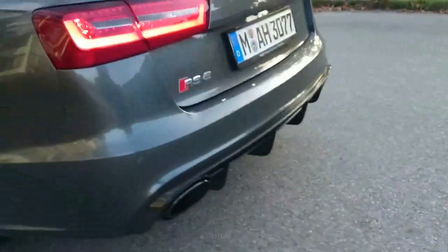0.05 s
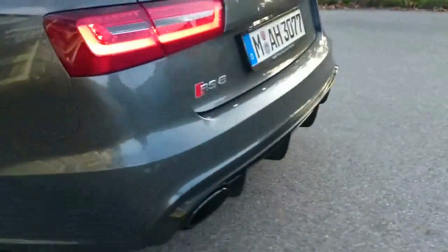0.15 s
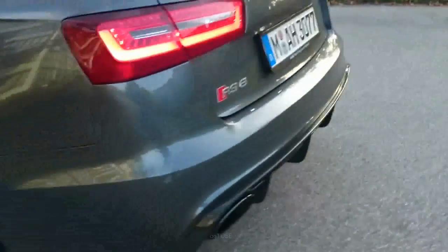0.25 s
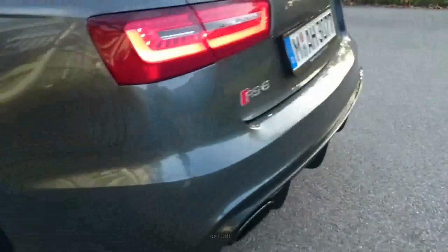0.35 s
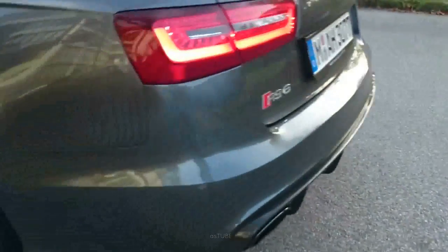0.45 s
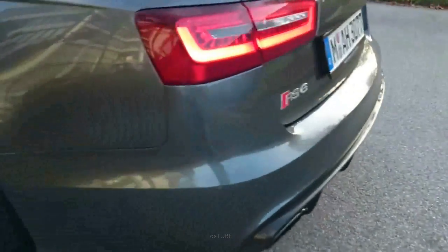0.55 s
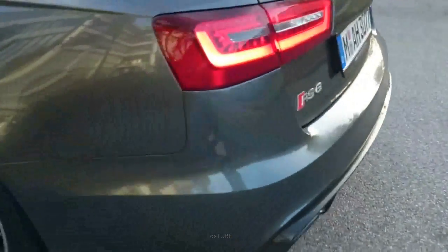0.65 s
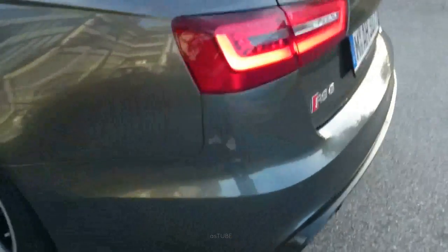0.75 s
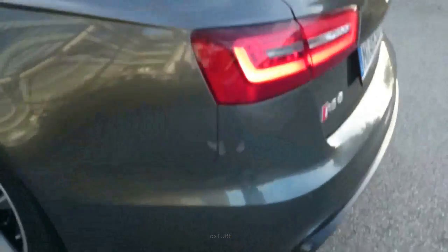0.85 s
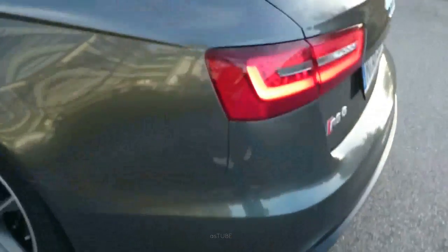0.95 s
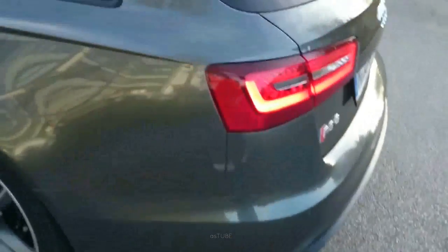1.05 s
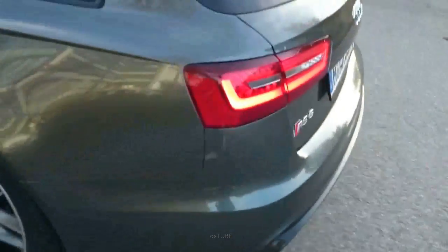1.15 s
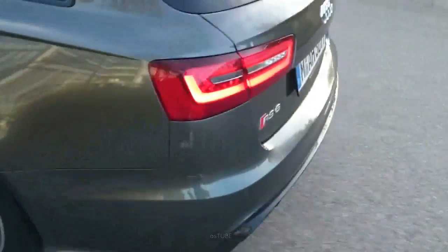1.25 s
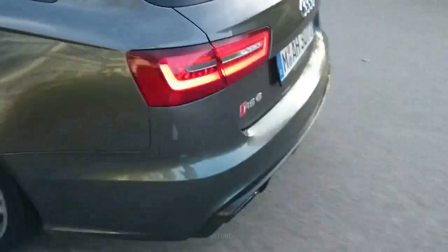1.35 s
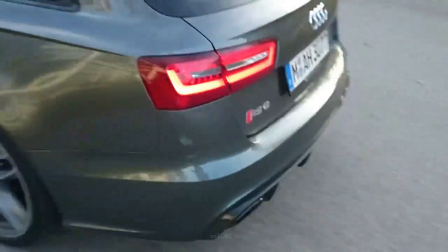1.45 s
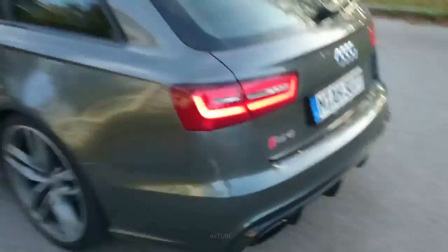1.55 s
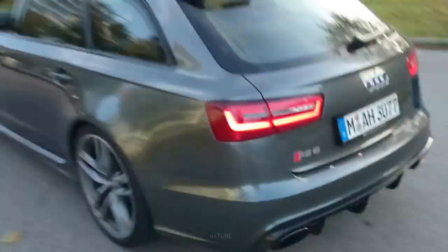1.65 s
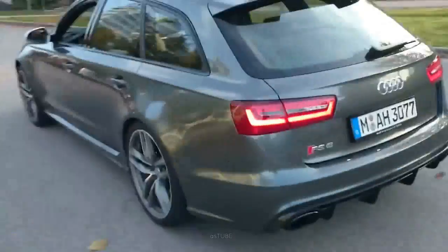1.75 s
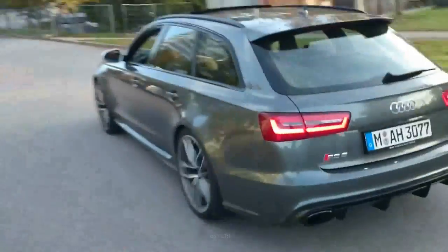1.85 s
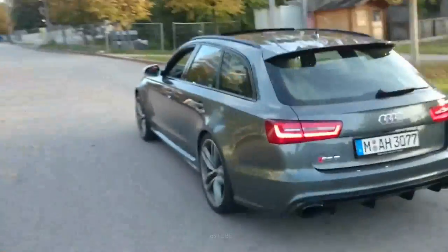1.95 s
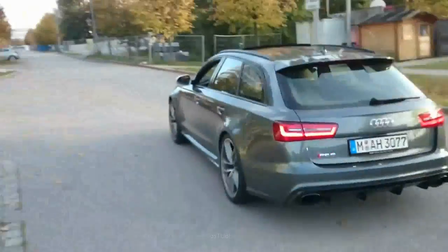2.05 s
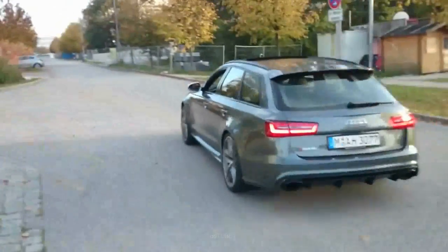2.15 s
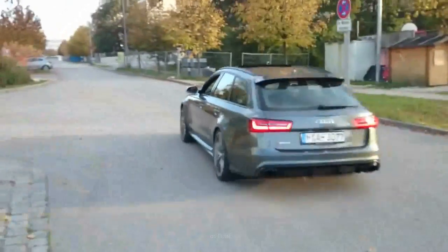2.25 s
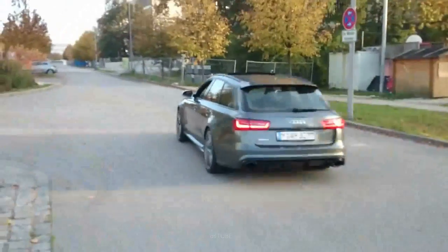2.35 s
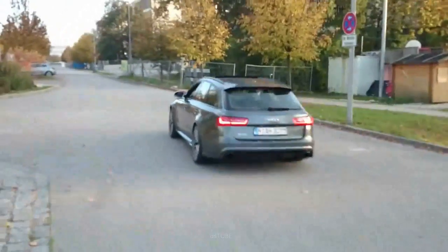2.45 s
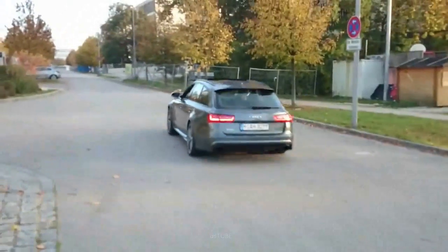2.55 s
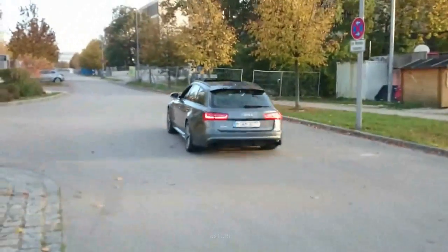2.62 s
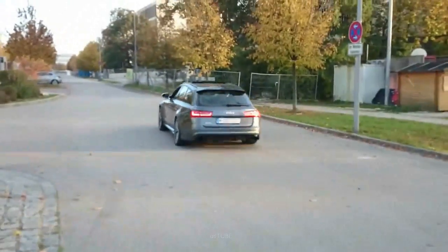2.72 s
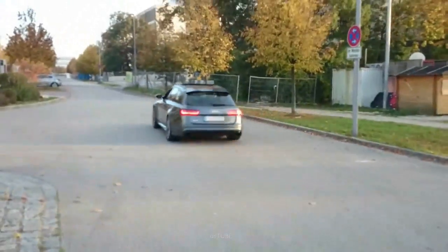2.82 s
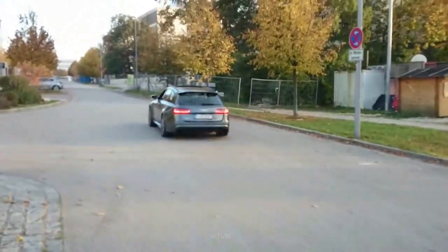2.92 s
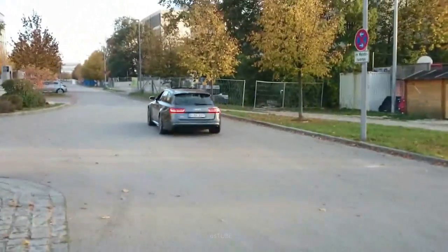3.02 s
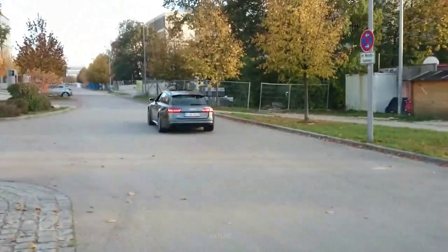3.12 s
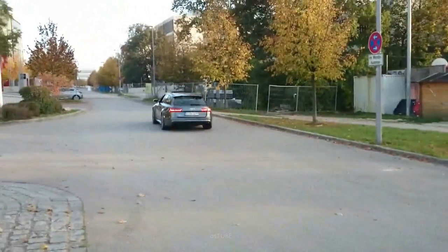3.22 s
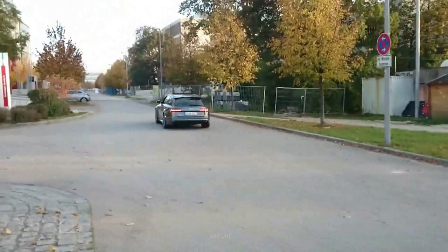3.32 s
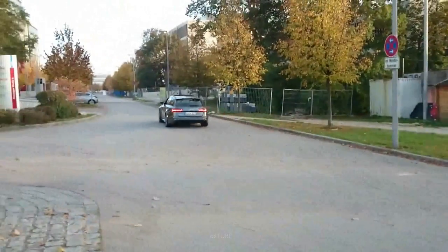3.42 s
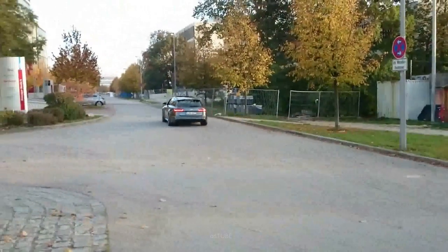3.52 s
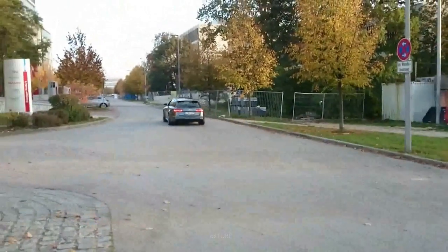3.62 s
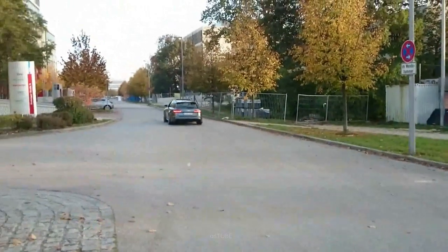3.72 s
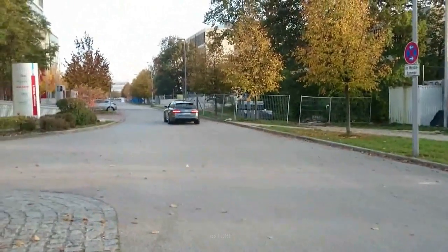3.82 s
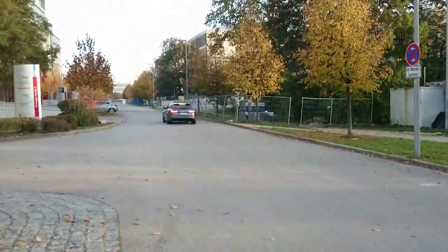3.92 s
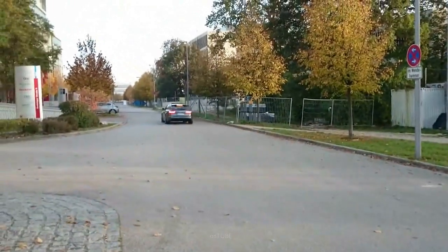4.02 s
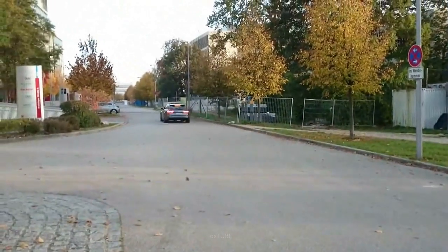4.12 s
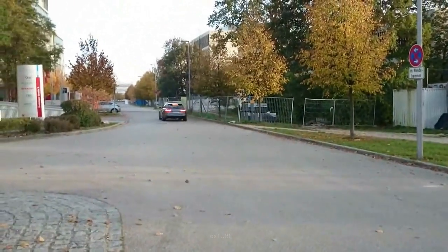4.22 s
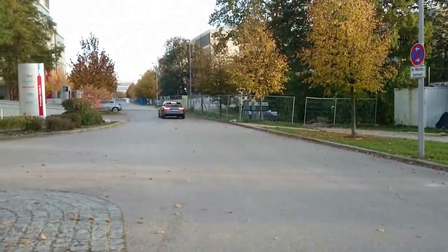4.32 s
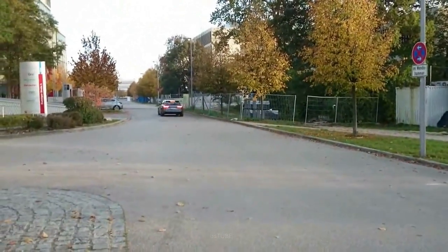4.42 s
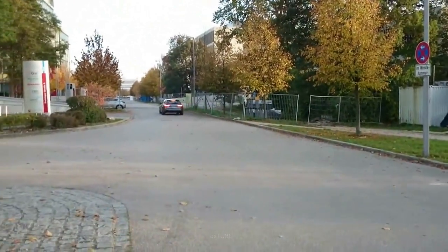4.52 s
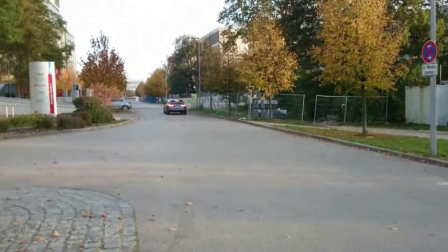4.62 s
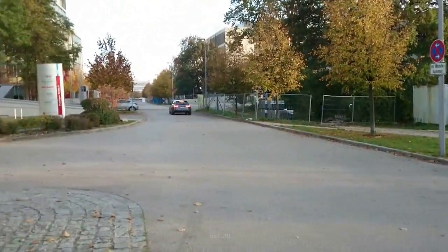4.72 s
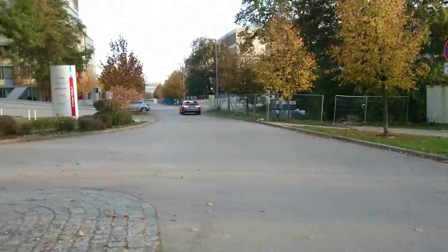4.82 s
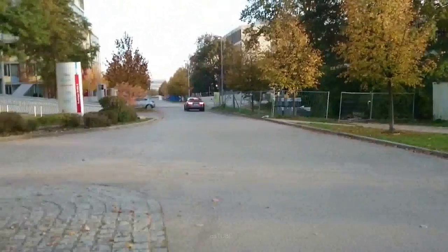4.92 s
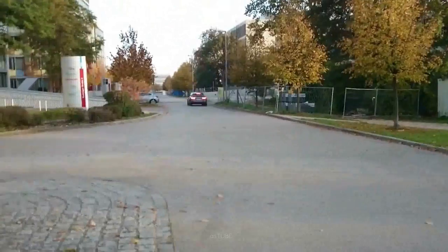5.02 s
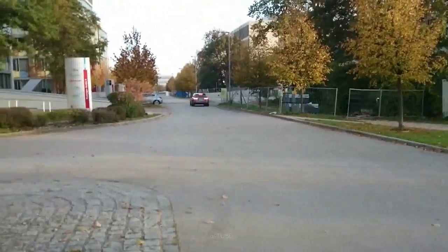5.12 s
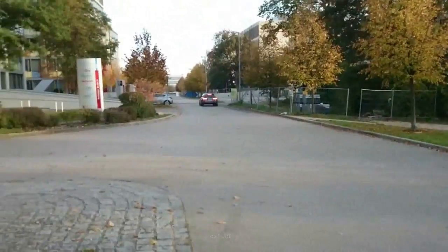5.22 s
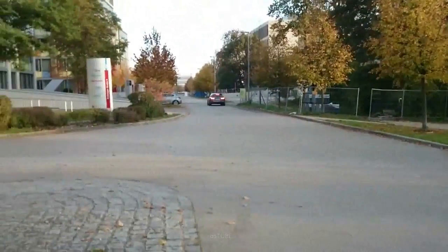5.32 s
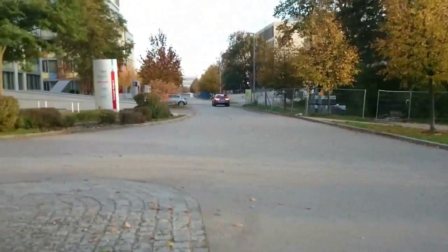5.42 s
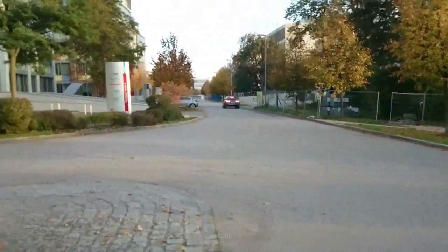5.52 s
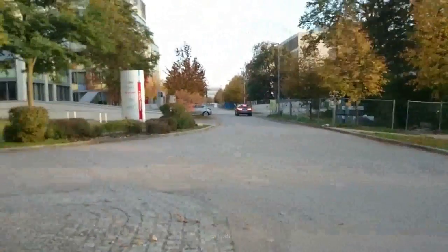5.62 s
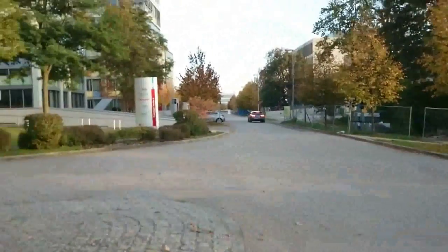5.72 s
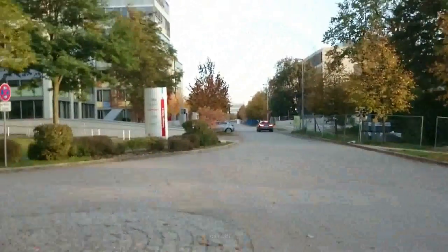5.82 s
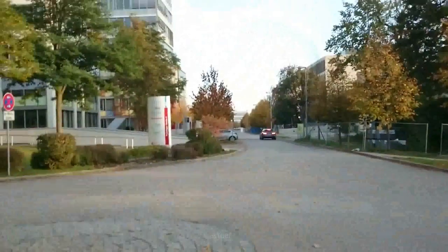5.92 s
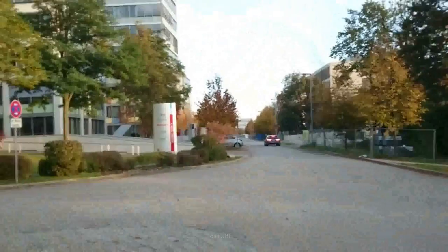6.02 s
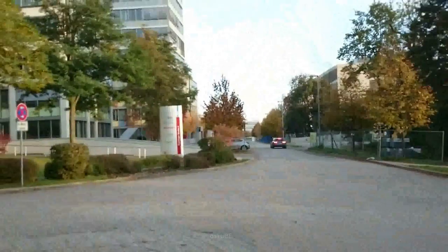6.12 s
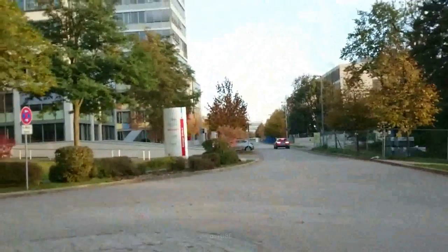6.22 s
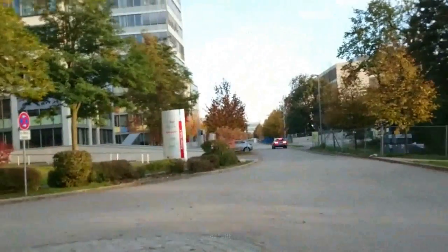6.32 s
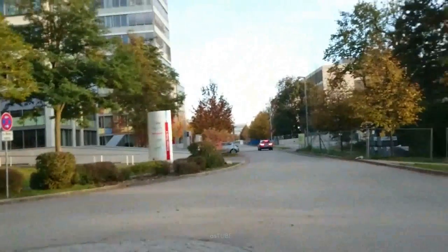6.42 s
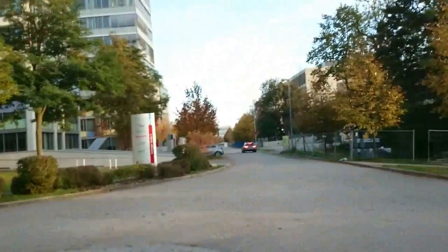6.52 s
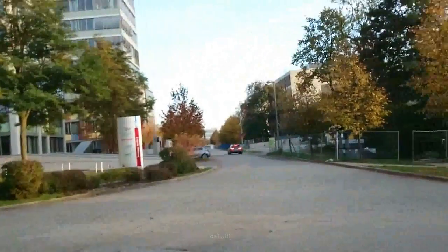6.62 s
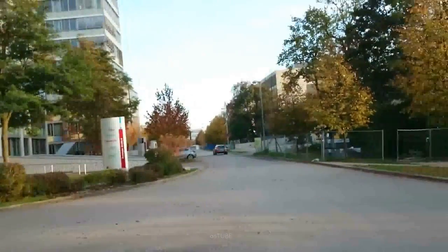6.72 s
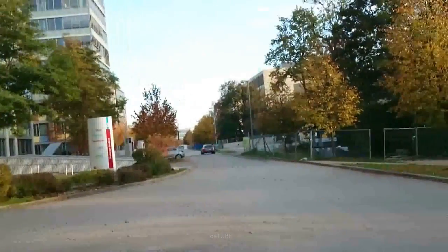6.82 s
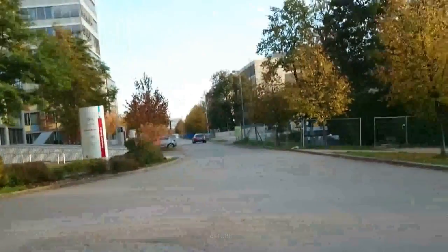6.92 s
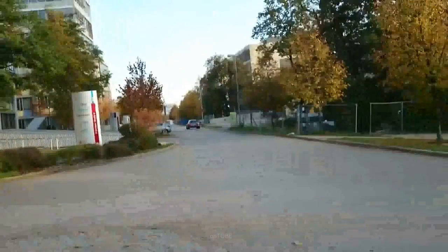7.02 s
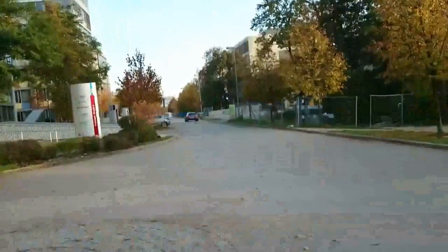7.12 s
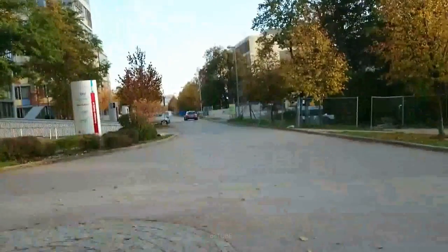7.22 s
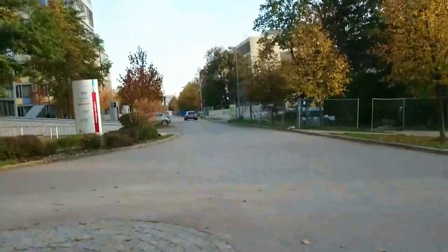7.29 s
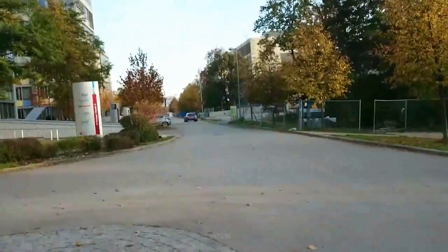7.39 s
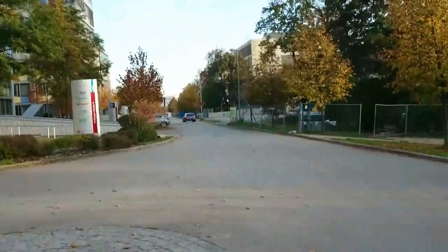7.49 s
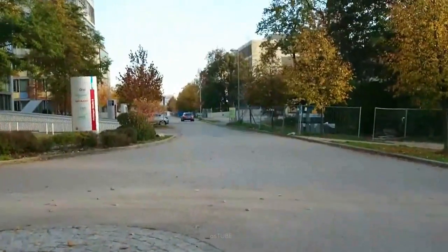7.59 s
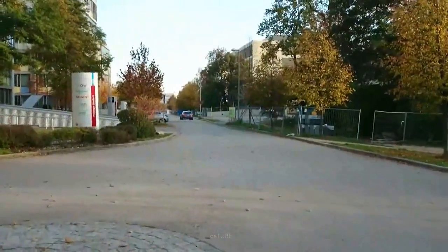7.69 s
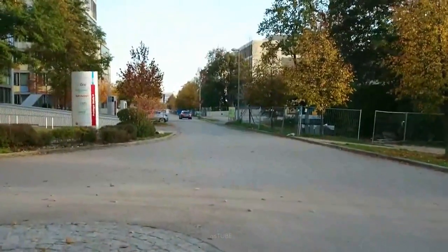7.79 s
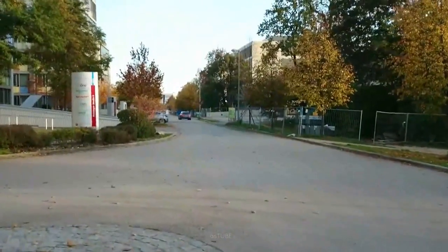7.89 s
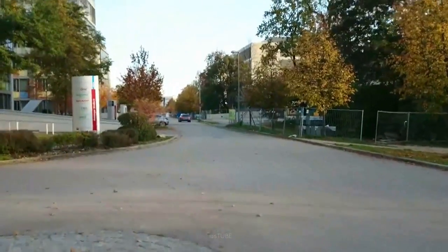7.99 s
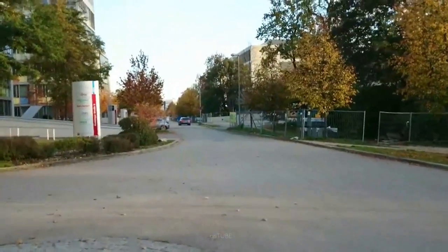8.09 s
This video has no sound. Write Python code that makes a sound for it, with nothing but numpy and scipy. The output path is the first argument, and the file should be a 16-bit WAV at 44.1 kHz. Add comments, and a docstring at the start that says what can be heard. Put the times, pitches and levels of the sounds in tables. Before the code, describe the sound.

A V8 estate car pulls away from a close handheld microphone on an open, tree-lined street. Soft idle throb with puffs, sudden growl, fast rise to a raspy roar, a crackling gearshift, then lift-off with dull flutter and scattered pops. Farther off it gets a short blip of throttle, more crackles, and a low distant drone with tyre roar thinning out. Faint echoes, tiny grit ticks, breeze and soft background noise remain.

```python
"""A turbocharged V8 idles beside the microphone, launches hard down a quiet street, shifts up once and lifts off.
Uneven exhaust pulses are filtered into a boom and a rasp, while puffs of noise make the hiss of the tailpipes.
With the throttle shut the pipes flutter and drone, and short bursts of noise and low swings make bangs.
Tyre roar fades with distance, a decaying noise tail echoes the car, and a breeze rumbles on the microphone
over a steady background noise. Gain control turns down the loud parts."""
import sys
import numpy as np
from scipy import signal
from scipy.fft import rfft, irfft, next_fast_len
from scipy.io import wavfile
from scipy.ndimage import uniform_filter1d, map_coordinates

SR = 44100
rng = np.random.default_rng(int(sys.argv[2]) if len(sys.argv) > 2 else 0)


def waveform_to_disk(signal):
    """Save audio, clipped to [-1, 1], as 16-bit WAV at the path in sys.argv[1]."""
    frames = np.transpose(np.atleast_2d(signal))
    scaled = np.clip(frames, -1, 1) * 32767
    samples = np.round(scaled).astype(np.int16)
    wavfile.write(sys.argv[1], SR, samples)


N = 359396
T = np.arange(N) / SR  # time of every sample, s
HZ = np.fft.rfftfreq(N, 1 / SR)
FAR_M = 33  # distance at which the far colours are complete

# Balance of the boom. Each row: time in seconds, left minus right in dB.
BOOM_PAN = [(0, -19), (1, -10.5), (1.35, -4), (2.7, -2.5), (3.9, -4.5), (5.4, -10.5), (8.15, -4.5)]


def exhaust(metres):
    """Pulses boom and howl in the pipes, their steep fronts rasp, and each pushes out a hissing jet."""
    hz = revolutions()
    boom_db, rasp_db, hiss_db, scatter_db = effort(hz, metres)
    turns = np.cumsum(hz) / SR  # engine cycles so far
    slots, strength, gas = firings(turns, hz, scatter_db)
    times = np.interp(slots / len(CYLINDERS), turns, T)
    waves = blowdown(turns, slots, strength)
    revs = np.clip(hz / 45, 0, 1)
    idling = np.clip((7.4 - hz) / 1.2, 0, 1)
    far = np.minimum(metres / FAR_M, 1) ** 2
    boom = pipe_boom(waves, turns, times, idling, far, metres)
    rasp = pipe_rasp(waves, times, strength, revs, idling, far)
    hiss = tailpipe_hiss(times, gas, revs, hiss_db)
    pan_db, = curves(BOOM_PAN)
    pan = undb(np.array([pan_db, -pan_db]) / 2)
    panned_boom = boom * undb(boom_db) * pan / pan.mean(axis=0)
    return (panned_boom + rasp * undb(rasp_db) + hiss * undb(hiss_db)) / metres


# Engine speed before the shudder. Each row: time in seconds, cycles of eight firings per second in Hz.
SPEED = [(0, 5.95), (1.04, 5.95), (1.12, 7.6), (1.2, 12.3), (1.3, 16), (1.5, 18.1), (1.75, 18.2), (2, 20.5),
         (2.25, 23.9), (2.5, 29.4), (2.7, 34.7), (2.96, 41), (3.25, 48.1), (3.46, 51.3), (3.59, 51.8),
         (3.64, 43), (3.74, 38.3), (3.8, 39), (3.9, 40.9), (3.97, 40.5), (4.1, 37.6), (4.3, 40),
         (5.05, 35.5), (5.25, 32.8), (5.6, 31.4), (5.8, 31.5), (5.9, 35.4), (6, 38.9), (6.08, 39.2),
         (6.7, 35), (7.1, 33), (7.6, 32.3), (8.05, 33.4), (8.15, 34.5)]
# the driveline rocks after the shift; the depth is a share of the engine speed
SHUDDER_S, SHUDDER_LENGTH_S, SHUDDER_HZ, SHUDDER_DEPTH = 3.7, .15, 13, .025


def revolutions():
    """Engine speed (Hz), which shudders briefly as the next gear bites."""
    hz, = curves(SPEED)
    since = np.maximum(T - SHUDDER_S, 0)
    rocking = np.sin(2 * np.pi * SHUDDER_HZ * since) * np.exp(-since / SHUDDER_LENGTH_S)
    return hz * (1 + SHUDDER_DEPTH * rocking)


# Presses of the throttle. Each row: pressed at in seconds, released at in seconds, opening from 0 to 1.
THROTTLE = [(1.04, 3.6, 1), (3.62, 3.99, 0.95), (5.78, 6.05, 0.58), (7.52, 8.15, 0.24)]


def throttle(attack_s=0.034, release_s=0.065):
    """Throttle opening, which takes a moment to rise and fall."""
    return spells(THROTTLE, attack_s, release_s)


def turbo_boost(spool_up_s=0.53, spool_down_s=1):
    """The turbos lag behind the throttle, since they must first spin up."""
    return spells(THROTTLE, spool_up_s, spool_down_s)


# Spells of ragged after-burning. Each row: start in seconds, end in seconds, lift of the boom in dB.
BURBLES = [(3.608, 3.67, 3), (4.05, 4.35, 4.5), (4.37, 4.96, 5), (6.187, 6.594, 5.5), (7.31, 7.399, 0.5)]


def after_burning(attack_s=0.015, release_s=0.075):
    """Lift of the boom (dB) while fuel burns raggedly in the pipes."""
    return spells(BURBLES, attack_s, release_s)


# Exhaust at full throttle and full boost, 1 m away, before idle muffling and far colours.
# Each row: engine speed in Hz, boom in dB, rasp in dB, hiss in dB.
FULL_THROTTLE = [(5.9, 16.5, -19.5, -46.5), (7.55, 19.5, -14.5, -14), (11.7, 8.5, -19, -7.5),
                 (16.66, 14, -12, -1), (21.1, 13, -6.5, 0.5), (29.47, 15, 1, 6), (38.9, 16.5, 10.5, 13.5),
                 (46, 15.5, 17.5, 18.5)]
# The idle swells and sinks; the last value holds on. Each row: time in seconds, change of the boom in dB.
IDLE_SWELL = [(0, -15), (.06, -32.5), (.2, -0.5), (.35, 12), (.55, -5.5), (.77, -14.5), (.97, -12),
              (1.1, -5.5)]
SHUT_BOOM_DB, SHUT_RASP_DB, SHUT_HISS_DB = -24.5, -23.5, -12  # changes with the throttle shut
BOOST_DB = 22  # full boost adds this much hiss
AIR_LOSS_DB_PER_M = 0.8657  # of the hiss
BURBLE_RASP_SHARE = 0.12  # the rasp gets this share of the burble's lift in dB
LOAD_SCATTER_DB, SHUT_SCATTER_DB = .65, 2  # spread of firing strength under load and with the throttle shut


def effort(hz, metres):
    """Boom, rasp and hiss levels and firing scatter (dB), from revs, throttle, boost and after-burning."""
    revs, *columns = np.transpose(FULL_THROTTLE)
    boom_db, rasp_db, hiss_db = (np.interp(hz, revs, column) for column in columns)
    shut = 1 - throttle()
    lag = 1 - turbo_boost()
    burble_db = after_burning()
    swell_db, = curves(IDLE_SWELL)
    return (boom_db + SHUT_BOOM_DB * shut + burble_db + swell_db,
            rasp_db + SHUT_RASP_DB * shut + BURBLE_RASP_SHARE * burble_db + swell_db / 2,
            hiss_db + SHUT_HISS_DB * shut - BOOST_DB * lag - AIR_LOSS_DB_PER_M * metres,
            LOAD_SCATTER_DB + (SHUT_SCATTER_DB - LOAD_SCATTER_DB) * shut ** 4 + burble_db)


# The eight exhaust pulses of a cycle, before random scatter. Each row: lateness at high revs in firing
# intervals, strength in dB, gas blown out in dB (before the boost brings it out).
CYLINDERS = [(-.22, 2, 10), (.51, 2, -3), (-.15, 2, -3), (.53, -1, -1), (.04, -1, -2), (.05, 0, -4),
             (-.57, -3, -4), (-.18, 2, 0)]


def firings(turns, hz, scatter_db, lumpy_hz=15, stray=.012):
    """Place, strength and gas flow of each pulse; the two banks bunch up as the revs rise."""
    slot = len(CYLINDERS) * turns
    k = np.arange(np.ceil(slot[0]) + 1, slot[-1] - 1).astype(int)
    late, db, gas_db = np.array(CYLINDERS)[k % len(CYLINDERS)].T
    lump = np.minimum(np.interp(k, slot, hz) / lumpy_hz, 1) ** 2
    # poor burns vary in both timing and strength
    chance = np.clip(rng.standard_normal((len(k), 2)).T, -2, 2)
    slip, burn_db = np.interp(k, slot, scatter_db) * chance
    return k + lump * late + stray * slip, undb(db + burn_db), undb(gas_db + burn_db)


# One blowdown, fixed in crank angle. Each row: multiple of the cycle rate, level in dB.
BLOWDOWN = [(.4, -24), (1, 8), (2, 6), (3, 2.5), (4, 3), (5, 1), (6, -1.5), (7, -3.5), (8, -.5), (9, .5),
            (10, -3), (11, -1), (12, -4), (13, -4.5), (15, -12), (17, -11.5), (24, -17), (34, -29),
            (55, -60)]


def blowdown(turns, slots, strength, size=256):
    """Pressure waves laid out in crank angle: long and soft at idle, short and hard at high revs."""
    # a grid of equal steps in crank angle, size steps per cycle
    grid = np.arange(np.floor(turns[0]) * size, np.ceil(turns[-1]) * size) / size
    at = np.clip((slots / len(CYLINDERS) - grid[0]) * size, 0, len(grid) - 1)
    clicks = np.bincount(np.round(at).astype(int), strength, len(grid))
    shape = undb(spectrum(BLOWDOWN, np.fft.rfftfreq(len(grid), 1 / size)))
    waves = irfft(rfft(clicks - clicks.mean()) * shape, len(grid))
    return np.interp(turns, grid, waves)


# Colour of the pipes. Each row: frequency in Hz, level in dB.
PIPE = [(8, -2.5), (20, 11.5), (52, 7.5), (72, 6.5), (90, 6.5), (160, 2), (200, 1.5), (240, 3), (320, -9),
        (440, -6), (700, -26), (1500, -62)]
# What distance does to the boom. Each row: frequency in Hz, change in dB.
FAR_BOOM = [(60, -6), (115, -3), (160, 4.5), (200, 4), (230, 4.5), (265, -12.5), (350, -11), (430, 2.5)]
WAVER_DB = 6  # spread of the boom's level at the farthest point, less when nearer


def pipe_boom(waves, turns, times, idling, far, metres):
    """The pipes ring low with each pressure wave; on the overrun the even note breaks up."""
    boom = steady(colour(waves, PIPE))
    # far away the ground hollows out the low middle
    boom = (1 - far) * boom + far * colour(boom, FAR_BOOM)
    # the note breaks up with the throttle shut on the move, or the spark cut for the shift
    burble_db = after_burning()
    shut = np.clip(1 - throttle() / .12, 0, 1)
    overrun = np.clip(shut * (1 - idling) + (burble_db / 2.8) ** 2, 0, 1)
    mixed = np.sqrt(1 - overrun) * boom + np.sqrt(overrun) * coasting(turns, times, burble_db)
    return mixed * undb(WAVER_DB * walk(11) * metres / metres.max())


# Flutter of the pipes when the wheels drive the engine. Each row: frequency in Hz, level in dB.
OVERRUN = [(30, -10), (60, -3), (95, 0.5), (140, 0.5), (230, -0.5), (290, -12.5), (450, -20), (900, -49.5)]
DRONE_ORDER = 3  # drone pitch as a multiple of the cycle rate
DRONE_DB, DRONE_FLICKER_DB = 5, 6  # drone over the flutter before burbles, and the spread of its level
DRONE_DROWNED = 2.5  # dB that the drone loses for each dB of burble


def coasting(turns, times, burble_db):
    """Without proper ignition the pipes flutter at random over one faltering low order."""
    flutter = steady(colour(pulses(times, rng.standard_normal(len(times))), OVERRUN))
    drone_db = DRONE_DB + DRONE_FLICKER_DB * walk(13) - DRONE_DROWNED * burble_db
    drone = np.sqrt(2) * np.sin(2 * np.pi * DRONE_ORDER * turns) * undb(drone_db)
    return steady(flutter + drone)


# Pipe resonances that the upper orders howl in. Each row: frequency in Hz, level in dB.
HOWL = [(150, -34), (300, -4.5), (420, 1), (590, 2), (720, -5.5), (1000, -20), (2000, -46.5)]
# Colour of the steep fronts and the turbulence. Each row: frequency in Hz, level in dB.
RASP = [(150, -39.5), (300, -5), (430, 0), (600, 2.5), (740, -4), (1000, -3), (1400, -11.5), (2000, -14),
        (3000, -15.5), (4500, -16), (9000, -85)]
# What air and ground do to the rasp far down the street. Each row: frequency in Hz, change in dB.
FAR_LOSS = [(280, -14), (370, -12.5), (440, -0.5), (600, -5), (1200, 2.5), (2500, -10), (5000, -11)]
# What idling does to the rasp. Each row: frequency in Hz, change in dB.
MUFFLED = [(130, 34.5), (220, 28), (330, 9), (500, 2), (1100, -5.5), (2200, -19.5), (4000, -34.5)]


def pipe_rasp(waves, times, strength, revs, idling, far):
    """Howling resonances, steep pressure fronts and turbulent puffs together make the rough edge."""
    # the upper orders howl once the revs carry them into the pipe resonances
    howl = np.sqrt(revs) * steady(colour(waves, HOWL))
    # the steep fronts arrive unevenly, which smears the highest orders into a roar
    arrivals = times + .0002 * np.interp(times, T, revs) * rng.standard_normal(len(times))
    front_sizes = strength * undb(2.6 * rng.standard_normal(len(times)))
    fronts = np.sqrt(revs) * steady(colour(pulses(arrivals, front_sizes), RASP))
    flow = puffs(pulses(times, strength), decay_s=0.02) + 0.2
    turbulence = steady(colour(flow * air(width=0.26), RASP))
    rasp = steady(.95 * howl + .9 * fronts + .68 * turbulence)
    rasp = (1 - far) * rasp + far * colour(rasp, FAR_LOSS)
    # at idle the gas leaves slowly and its puffs are muffled
    return (1 - idling) * rasp + idling * colour(rasp, MUFFLED)


# Colour of the tailpipe jet. Each row: frequency in Hz, level in dB.
HISS = [(500, -40.5), (1500, -9), (2500, -9.5), (4000, -14.5), (4900, -4.5), (5400, 4), (5900, -2),
        (7000, -9.5), (7700, -7), (8250, -8), (8900, -11.5), (11300, -21), (13000, -14.5), (15500, -24.5)]
JET_WANDER, JET_WANDER_RATE = .018, 110  # the whistle's pitch wanders by about this share; steps per second
STEADY_FLOW = .35  # flow between the puffs at high revs, less at low revs
GAS_ACCENT, GAS_SCATTER_DB = 2.2, .8  # how far boost brings out the strong puff; random spread of the puffs


def tailpipe_hiss(times, gas, revs, hiss_db):
    """Each pulse pushes a jet of gas out of the tailpipe, which hisses."""
    # boost brings out the one strong puff of each cycle, less so at high revs
    boost = np.interp(times, T, turbo_boost())
    accent = GAS_ACCENT * boost ** .3 * (1 - .72 * np.interp(times, T, revs))
    gas = gas ** accent * undb(GAS_SCATTER_DB * rng.standard_normal(len(gas)))
    # the second pass softens the onset of each puff
    flow = puffs(puffs(pulses(times, gas), decay_s=.005), decay_s=.0006)
    whistle = bend(colour(air(width=.85), HISS), 1 + JET_WANDER * walk(JET_WANDER_RATE))
    jet = steady((flow + STEADY_FLOW * np.sqrt(revs)) * whistle)
    # where the hiss is weak its top is darker
    force = np.clip((hiss_db + 34.5) / 17, 0, 1)
    dull_hiss = colour(jet, [(7500, 8.5), (9000, 5.0), (11000, -14.5)])
    return force * jet + (1 - force) * dull_hiss


# Unburnt fuel going off in the pipes, and at 3.71 s one heavy low thump. Each row: start in seconds, peak of
# the bark # in dB, peak of the crack in dB, peak of the low thump in dB, thump pitch in Hz, bark pitch in Hz,
# time scale of the tail in seconds.
BANGS = [(3.627, -8, -7, -9.5, 89, 965, 0.017), (3.65, -11, -5, -9, 85, 1113, 0.02),
         (3.675, -2, -6.5, -20, 80, 908, 0.016), (3.71, -5, -11.5, -7, 175, 800, 0.013),
         (4.411, -7.5, -27, -14.5, 109, 1020, 0.0029), (4.453, -10.5, -31, -19, 146, 1120, 0.012),
         (4.465, -18, -41, -16.5, 146, 950, 0.0032), (4.518, -16, -40.5, -14.5, 134, 910, 0.0025),
         (4.566, -11, -38, -33, 130, 1030, 0.0045), (4.6685, -4.5, -16, -16, 112, 1040, 0.011),
         (4.702, -26, -23.5, -41, 120, 1200, 0.011), (4.712, -19, -27, -31, 119, 980, 0.0071),
         (4.732, -24, -30, -24, 111, 900, 0.0036), (4.771, -29, -35, -17.5, 70, 900, 0.0045),
         (4.821, -33, -53, -23, 78.4, 900, .004), (4.872, -7.5, -22, -21, 109, 1070, 0.016),
         (4.882, -18, -42, -25, 95, 950, 0.0045), (4.929, -36, -37, -18.5, 69, 850, 0.0044),
         (4.967, -17.5, -50, -20, 92, 950, 0.0041), (6.204, -20, -36, -20, 113, 1060, 0.006),
         (6.2705, -7.5, -50, -23, 111, 990, 0.0075), (6.283, -23, -47, -32, 122, 1100, 0.0068),
         (6.331, -28, -53.5, -23, 105, 1190, .006), (6.3466, -14, -36, -31, 128, 1180, 0.008),
         (6.427, -13.5, -44, -20, 131, 1310, 0.0077), (6.4376, -14, -41, -22, 120, 950, 0.0055),
         (6.459, -25, -45, -35, 125, 850, .005), (6.492, -14.5, -37, -21.5, 115, 960, 0.0026),
         (6.5426, -13.5, -22, -22.5, 133, 1030, 0.0075), (6.59, -33, -39, -23, 75.6, 900, .004),
         (6.862, -28.5, -52, -50, 120, 1000, 0.0039)]
# Colour of a bark. Each row: multiple of its bark pitch, level in dB.
BARK = [(.07, -3.5), (.13, 7), (.19, 22), (.26, 2), (.36, 3.5), (.55, 18), (.74, 6.5), (1, 16), (1.45, 2.5),
        (2.1, -4), (3.8, -13.5), (9.5, -80)]
# Colour of a crack before it bends. Each row: frequency in Hz, level in dB.
CRACK = [(500, -33.5), (2000, -13), (3600, -8), (4600, -1), (5300, 2), (6500, -5), (8200, -13),
         (10000, -27), (15000, -45)]
CRACKLE_PER_S, CRACKLE_SIZE = 1500, .28  # small explosions that trail a bang; size against the first shock
CRACK_RAGGED_DB = 4  # flutter of the crack
CRACK_BEND, CRACK_BEND_S = 0.17, 0.0021  # a crack starts this share sharp and sinks as the jet slows


def bangs(crack_share=.8, thump_cycles=.45):
    """A shock front with a crackling tail barks in the pipe, cracks at its mouth and shoves out a low swing."""
    out, t = np.zeros((2, N)), np.arange(SR // 6) / SR
    knots = t[::SR // 500]
    for s, bark_db, crack_db, thump_db, thump_hz, bark_hz, tail_s in BANGS:
        goes_off = rng.random(len(t)) < CRACKLE_PER_S / SR
        crackle = goes_off * np.tanh(air(width=.3, size=len(t)))
        shock = CRACKLE_SIZE * crackle * np.exp(-t / (2 * tail_s)) - (t == 0)
        bark = colour(shock, [(ratio * bark_hz, db) for ratio, db in BARK])
        flutter = undb(CRACK_RAGGED_DB * np.interp(t, knots, rng.standard_normal(len(knots))))
        jet = air(width=0.34, size=len(t)) * flutter * np.exp(-t / (crack_share * tail_s))
        crack = bend(colour(jet, CRACK), 1 + CRACK_BEND * np.exp(-t / CRACK_BEND_S))
        swing = np.sqrt(t) * np.exp(-t / (thump_cycles / thump_hz + tail_s / 2))
        thump = -np.sin(2 * np.pi * thump_hz * t) * swing
        for part, db in ((bark, bark_db), (crack, crack_db), (thump, thump_db)):
            add(out, s, part / np.abs(part).max() * undb(db))
    return out


# Soft puffs at idle and launch. Each row: start in seconds, peak in dB.
CHUFFS = [(.3, -25), (0.476, -31.5), (0.607, -33.5), (1.069, -27)]
# Colour of a puff. Each row: frequency in Hz, level in dB.
CHUFF = [(120, -21.5), (330, 6), (700, 3), (1200, -17.5), (2500, -50.5)]


def chuffs(decay_s=0.028):
    """Soft puffs of gas: noise that dies away quickly."""
    out, t = np.zeros((2, N)), np.arange(SR // 5) / SR
    for s, db in CHUFFS:
        puff = colour(air(width=.3, size=len(t)) * np.exp(-t / decay_s), CHUFF)
        add(out, s, puff / np.abs(puff).max() * undb(db))
    return out


def pump(metres, hz=466, db=-54):
    """A faint fuel-pump whine of slightly wandering pitch, which fades with distance."""
    pitch = hz * (1 + .004 * walk(8))
    return undb(db) / metres * np.sin(2 * np.pi * np.cumsum(pitch) / SR)


# the car gathers speed from launch to lift-off, then slows
LAUNCH_S, LIFT_S, START_M, ACCEL_M_S2, SLOWING_M_S2 = 1.01, 3.62, 1.32, 3.89, 2.13


def drive():
    """Road speed (m/s) and distance (m) of the car."""
    gained = ACCEL_M_S2 * np.clip(T - LAUNCH_S, 0, LIFT_S - LAUNCH_S)
    lost = SLOWING_M_S2 * np.maximum(T - LIFT_S, 0)
    speed = np.maximum(gained - lost, 0)
    return speed, START_M + np.cumsum(speed) / SR


# Colour of the tread roar. Each row: frequency in Hz, level in dB.
TYRES = [(250, -16.5), (700, -11.5), (920, 2), (1200, -0.5), (1600, -4.5), (2100, -14.5), (3000, -20.5),
         (4500, -27), (8000, -36.5), (12000, -67)]
TYRE_DB, TYRE_SPEED_POWER = 0, 1.655  # typical level at top speed, 1 m away; growth with road speed
HUSH_S, HUSH_LENGTH_S, HUSH_DB = 6.46, 0.17, -3.5  # the roar drops and stays lower


def tyres(speed, metres):
    """Tread roar builds with road speed, fades with distance and late on drops a little."""
    hush_db = HUSH_DB * np.clip((T - HUSH_S) / HUSH_LENGTH_S, 0, 1)
    roll = (speed / speed.max()) ** TYRE_SPEED_POWER / metres
    return unit(colour(air(width=0.37), TYRES)) * roll * undb(TYRE_DB + hush_db + 1.3 * walk(7.4))


# Grit ticking on the road. Each row: start in seconds, peak in dB, ring in Hz.
GRIT = [(5.389, -39.5, 4100), (5.515, -41, 4540), (5.596, -42, 4600), (5.771, -33, 4280),
        (6.498, -45, 5460), (7.535, -39.5, 2700)]


def grit(decay_s=0.0072):
    """Small stones tick on the asphalt: short noise bursts around one pitch."""
    out, t = np.zeros((2, N)), np.arange(SR // 20) / SR
    for s, db, hz in GRIT:
        burst = air(width=0.57, size=len(t)) * np.exp(-t / decay_s)
        tick = colour(burst, [(hz / 3, -28), (hz, 0), (hz * 2, -19), (hz * 4, -45)])
        add(out, s, tick / np.abs(tick).max() * undb(db))
    return out


# Dull knocks. Each row: start in seconds, level before the decay in dB, ring in Hz.
KNOCKS = [(5.695, -26.5, 430), (5.739, -32, 400)]


def knocks(decay_s=0.0036):
    """Short, dull knocks with one damped ring."""
    out, t = np.zeros((2, N)), np.arange(SR // 10) / SR
    for s, db, hz in KNOCKS:
        add(out, s, undb(db) * np.sin(2 * np.pi * hz * t) * np.exp(-t / decay_s))
    return out


def echoes(x, wet_db=-19, delay_s=0.0075, bass_t60_s=0.82, treble_t60_s=0.28, patchy_db=4, split_hz=2500):
    """Trees and house fronts scatter a patchy, late tail whose treble dies first."""
    t = np.arange(SR) / SR
    scatter = air(width=0.07, size=SR) * undb(patchy_db * walk(90)[:SR]) * (t > delay_s)
    low = signal.sosfilt(signal.butter(2, split_hz, fs=SR, output="sos"), scatter)
    high = signal.sosfilt(signal.butter(2, split_hz, "high", fs=SR, output="sos"), scatter)
    # T60 is the time in which a sound falls by 60 dB
    tail = low * undb(-60 * t / bass_t60_s) + high * undb(-60 * t / treble_t60_s)
    tail = tail / np.sqrt(np.sum(tail[0] ** 2))
    wet = signal.fftconvolve(x.mean(axis=0)[None], tail, axes=1)[:, :N]
    walls = [(60, 3), (400, 3), (1200, 1), (3000, 5), (4700, 6.5), (7000, 2), (14000, -4)]  # (Hz, dB)
    return undb(wet_db) * colour(wet, walls)


# Colour of the steady background noise: low rumble, murmur and a narrow hiss near 4.5 kHz.
# Each row: frequency in Hz, level in dB.
BACKGROUND_NOISE = [(20, -29), (100, -1), (300, -27.5), (900, -19.5), (2000, -29), (3600, -47),
                    (4500, -35.5), (5500, -52), (8000, -53), (11000, -80)]
# Breeze on the microphone, before each port takes its share. Each row: time in seconds, level in dB.
BREEZE = [(0, -21.5), (2.5, -22), (4.2, -29), (5, -26.5), (5.6, -29.5), (8.15, -37)]
# Colour of the breeze. Each row: frequency in Hz, level in dB.
GUSTS = [(3, -12.5), (10, -12.5), (25, -18.5), (50, -24.5), (200, -46.5), (1000, -94)]


def background():
    """Steady background noise, and a breeze that mostly catches the right port."""
    steady_noise = unit(colour(air(width=0.66), BACKGROUND_NOISE)) * undb(-48.0 + walk(20.0))
    db, = curves(BREEZE)
    gusts = unit(colour(air(width=0.91), GUSTS)) * undb(db + walk(5.3))
    return steady_noise + gusts * np.array([[.25], [1.3]])


def undb(db):
    """Decibels to gain."""
    return 10 ** (np.asarray(db) / 20)


def curves(table):
    """Each column of a time table, sample by sample."""
    s, *columns = np.transpose(table)
    return [np.interp(T, s, c) for c in columns]


def spells(rows, attack_s, release_s):
    """Each (start, end, height) row rises, holds and dies away."""
    total = 0
    for start, end, height in rows:
        rise = 1 - np.exp(-np.clip(T - start, 0, end - start) / attack_s)
        total = total + height * rise * np.exp(-np.maximum(T - end, 0) / release_s)
    return total


def spectrum(points, hz):
    """Decibels between the points, on a log-frequency axis."""
    f, db = np.transpose(points)
    return np.interp(np.log(hz + 1e-9), np.log(f), db)


def colour(x, points):
    """Filter with the given spectrum, acting only after each sound arrives (minimum phase)."""
    size = 2 * next_fast_len(x.shape[-1] // 2 + 4096)
    cepstrum = irfft(np.log(undb(spectrum(points, np.fft.rfftfreq(size, 1 / SR)))))
    # folding the second half onto the first removes any response ahead of the sound
    cepstrum[1:size // 2] *= 2
    cepstrum[size // 2 + 1:] = 0
    return irfft(rfft(x, size) * np.exp(rfft(cepstrum)))[..., :x.shape[-1]]


def unit(x):
    """Scale to rms 1."""
    return x / np.sqrt(np.mean(x ** 2))


def running_power(x, size):
    """Mean power of the channels, smoothed twice over size samples."""
    power = np.mean(np.atleast_2d(x) ** 2, axis=0)
    return np.abs(uniform_filter1d(uniform_filter1d(power, size), size)) + 1e-18


def steady(x):
    """Hold the running rms near 1, slowly enough to keep the throb."""
    return x / np.sqrt(running_power(x, SR // 9))


def walk(rate):
    """Random levels held 1 / rate s and smoothed twice; spread near 1."""
    k = int(SR / rate)
    steps = np.repeat(rng.standard_normal(N // k + 1), k)
    return 1.3 * uniform_filter1d(uniform_filter1d(steps, k), k)[:N]


def air(width, size=N):
    """Stereo white noise; width is side over mid."""
    mid, side = rng.standard_normal((2, size))
    return unit(np.array([mid + width * side, mid - width * side]))


def pulses(times, sizes):
    """Clicks, each shared between two neighbouring samples."""
    at = np.clip(times * SR, 0, N - 2)
    i = at.astype(int)
    return np.bincount(i, sizes * (1 - at + i), N) + np.bincount(i + 1, sizes * (at - i), N)


def puffs(clicks, decay_s):
    """Every click opens a flow that dies away."""
    return steady(signal.lfilter([1], [1, -np.exp(-1 / (decay_s * SR))], clicks))


def bend(x, rate):
    """Play a stereo sound at a changing rate, so that its resonances move."""
    return np.array([map_coordinates(channel, [np.cumsum(rate)], mode="mirror") for channel in x])


def add(out, s, sound):
    """Mix a short sound in at time s."""
    i = int(s * SR)
    out[:, i:i + sound.shape[-1]] += sound[..., :N - i]


NEAR_ECHO_SHARE = .6  # smallest share of the far echo drive, used when the car is close


def scene():
    """The car, its road noise and the street, which echoes more of the engine as it draws away."""
    speed, metres = drive()
    pipes, pops = exhaust(metres), bangs()
    echo_share = np.clip(metres / FAR_M, NEAR_ECHO_SHARE, 1)
    street = echoes(pipes * echo_share + undb(3) * pops)
    car = pipes + pops + chuffs() + pump(metres)
    road = tyres(speed, metres) + grit() + knocks()
    return car + road + street + background()


def gain_control(x, knee_db=-8.5, ratio=28):
    """Turn the sound down by most of what its running level exceeds the knee."""
    over_db = np.maximum(10 * np.log10(running_power(x, SR // 18)) - knee_db, 0)
    return x * undb(-over_db * (1 - 1 / ratio))


# Treble at the two microphone ports. Each row: frequency in Hz, left minus right in dB.
PORTS = [(700, 0), (1300, -4), (2400, 2), (4400, -2.5), (5600, -7), (8100, 12), (15000, 5)]
TOP_HZ = 15650  # nothing much is heard above this


def record(dry, ceiling=1.0):
    """Ports colour the treble, gain control holds down loud parts, peaks are rounded and the top is cut."""
    lean_db = spectrum(PORTS, HZ)
    ported = irfft(rfft(dry) * undb(np.array([lean_db, -lean_db]) / 2), N)
    held = gain_control(ported)
    rounded = held / (1 + (held / ceiling) ** 4) ** (1 / 4)
    return signal.sosfilt(signal.ellip(10, .2, 70, TOP_HZ, fs=SR, output="sos"), rounded)


dry = scene()
out = record(dry)
waveform_to_disk(out)
```